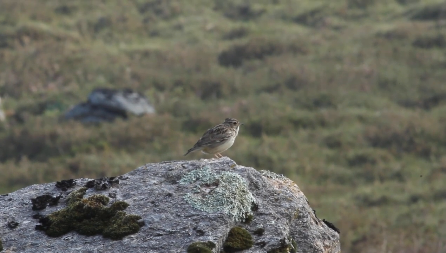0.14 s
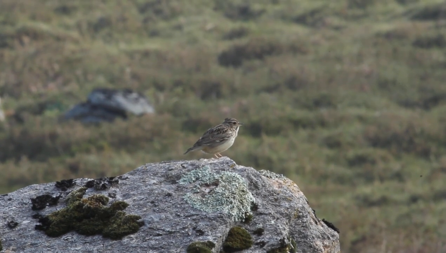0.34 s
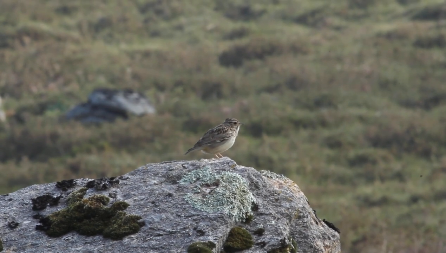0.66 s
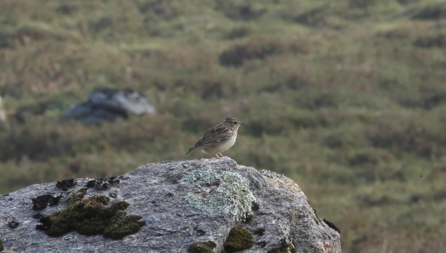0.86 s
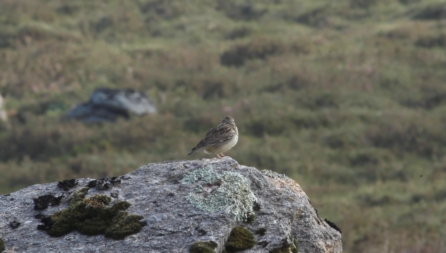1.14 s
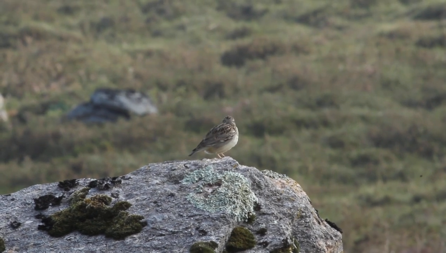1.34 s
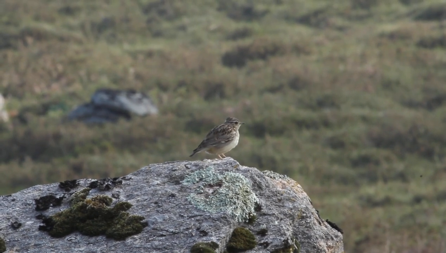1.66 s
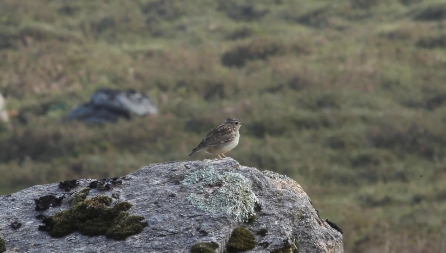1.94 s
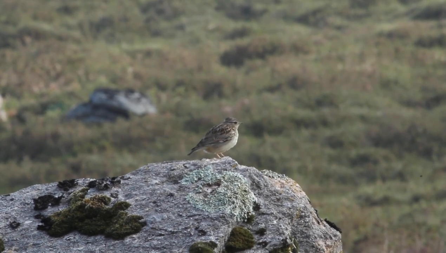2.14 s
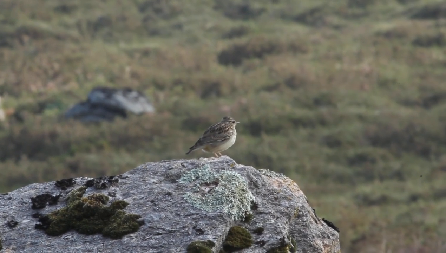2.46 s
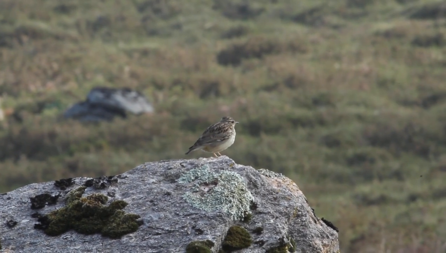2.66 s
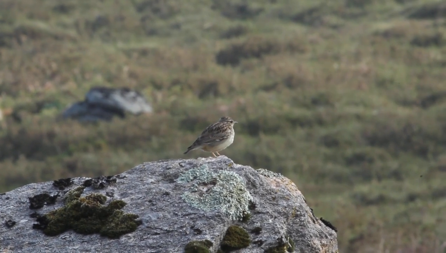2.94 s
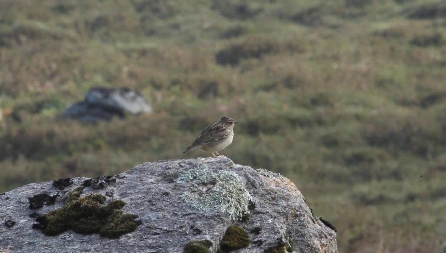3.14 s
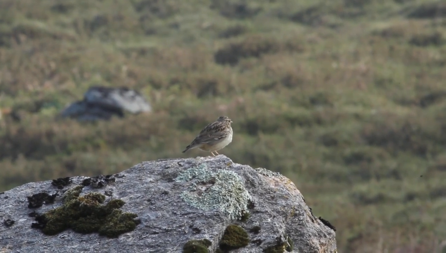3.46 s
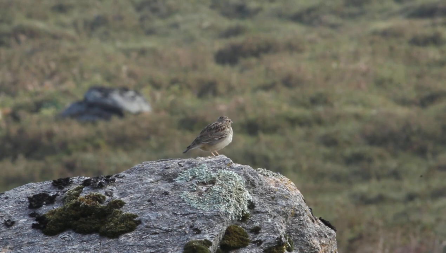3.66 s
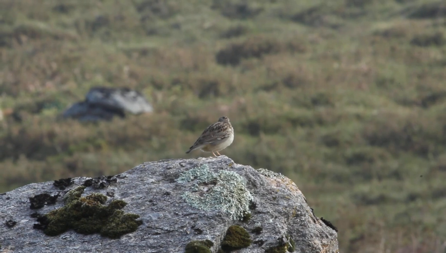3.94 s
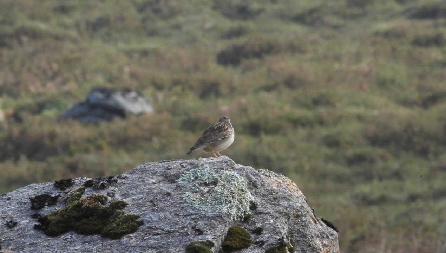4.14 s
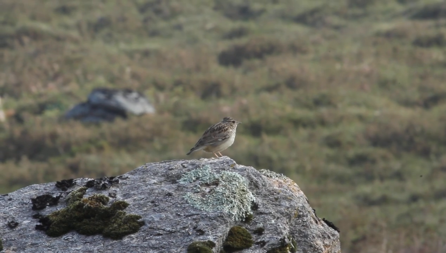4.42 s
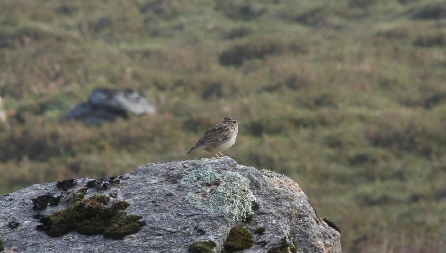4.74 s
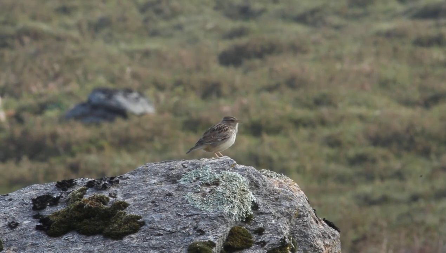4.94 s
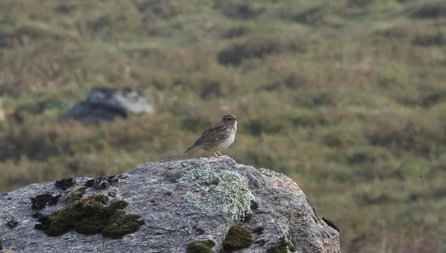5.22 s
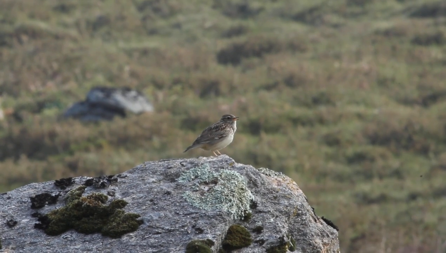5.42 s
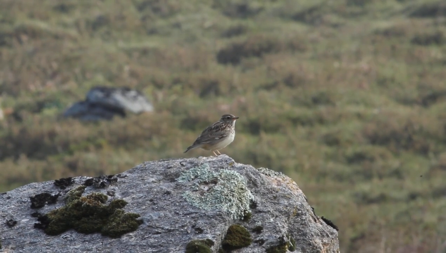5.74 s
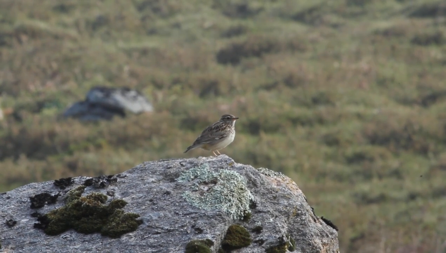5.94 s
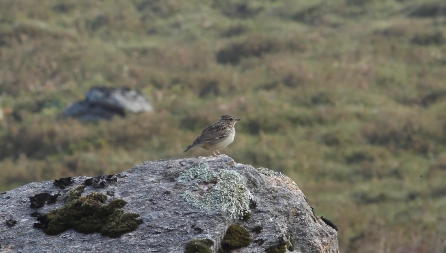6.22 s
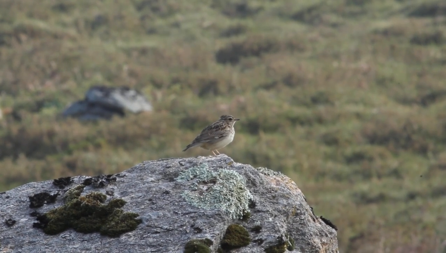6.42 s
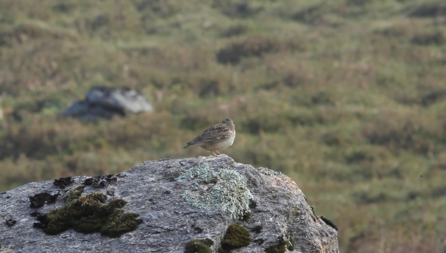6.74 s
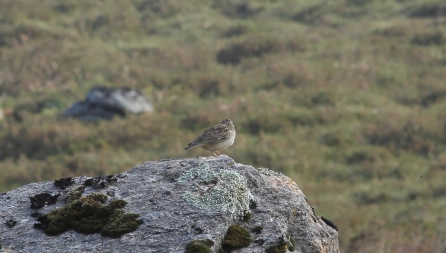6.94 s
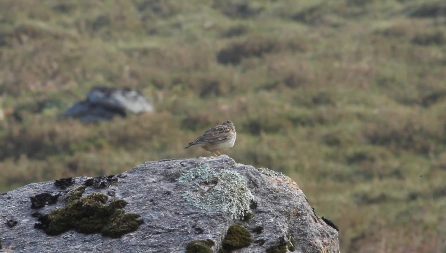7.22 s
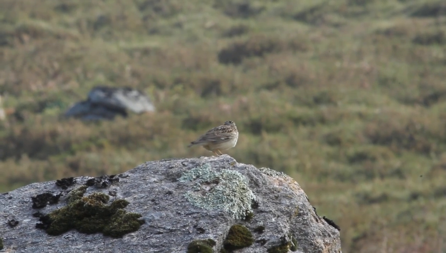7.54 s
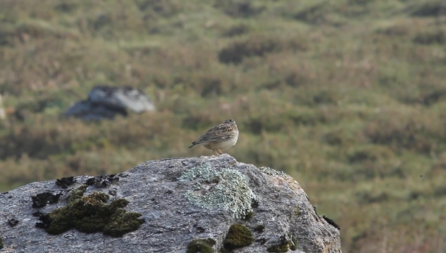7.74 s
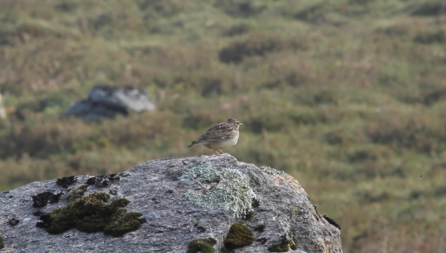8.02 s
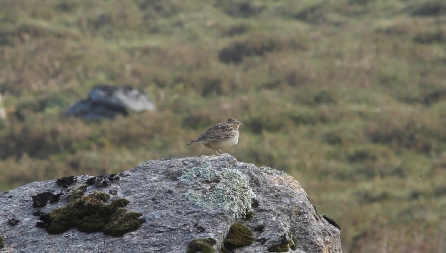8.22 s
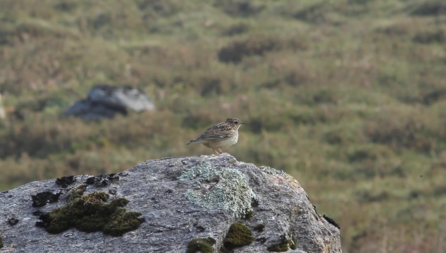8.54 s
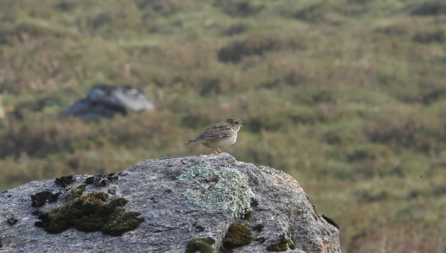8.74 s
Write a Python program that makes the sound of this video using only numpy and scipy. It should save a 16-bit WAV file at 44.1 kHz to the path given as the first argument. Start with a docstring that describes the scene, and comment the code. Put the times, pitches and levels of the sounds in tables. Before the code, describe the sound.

A small songbird whistles two clear, high phrases outdoors on a heath: a short one of three notes, then a longer, louder, descending one of seven wavering notes. Faint rising chirps follow each phrase, with distant birds in between. A soft, steady mechanical rattle and low hum continue throughout, along with a few ticks and even hiss. Wind briefly and faintly rumbles on the microphone in the second half.

```python
"""On a heathy hill, a woodlark on a boulder sings two phrases with its syrinx (a bird's voice box):
three arched whistles, then seven wavy ones that sink and swell. Short rising chips follow each phrase,
and other small birds call far off. Rocks and heath give a thin echo. Underneath, a motor hums low and
uneven taps rattle a small hollow body, while the air hisses and a few puffs of wind rumble."""
import sys
import numpy as np
from scipy import signal
from scipy.fft import rfft, irfft, next_fast_len
from scipy.io import wavfile
from scipy.ndimage import uniform_filter1d

SR = 44100
rng = np.random.default_rng(int(sys.argv[2]) if len(sys.argv) > 2 else 0)


def pcm_store(signal):
    """Save signal as 16-bit PCM."""
    levels = np.round(np.clip(np.atleast_2d(signal), -1, 1) * 32767)
    wavfile.write(sys.argv[1], SR, levels.astype(np.int16).T)


N = 391158
TIME = np.arange(N) / SR


def syrinx(notes, glide_s, flutter_db, second_db, third_db, waver=0.0032,
           throat_hz=3750, throat_width_hz=500, throat_db=4):
    """A nearly pure tone follows notes (t/s, f/Hz, level/dB); its third harmonic grows when pushed hard."""
    hz, gain = np.zeros(N), np.zeros(N)
    for note in notes:
        times, pitch, db = np.transpose(note)
        times = np.sort(times)
        span = slice(int(times[0] * SR), int(times[-1] * SR))
        hz[span.start:] = pitch[-1]
        hz[span] = smooth(np.interp(TIME[span], times, pitch), glide_s)
        gain[span] = undb(np.interp(TIME[span], times, db))
    gain = smooth(gain, seconds=0.00076) * undb(flutter_db * wander(200))
    phase = 2 * np.pi * np.cumsum(hz * (1 + waver * wander(405))) / SR
    # a note that starts an octave low rings the throat with its second harmonic: a tiny flick
    flick = undb(throat_db) * np.exp(-((2 * hz - throat_hz) / throat_width_hz) ** 2)
    # the second harmonic is also stronger where the song dips low
    second = flick + undb(second_db) * (throat_hz / np.maximum(hz, throat_hz / 2)) ** 3
    third = undb(third_db) * gain / undb(-24)  # -24 dB is full voice
    return np.sqrt(2) * gain * (np.sin(phase) + second * np.sin(2 * phase) + third * np.sin(3 * phase))


def arched_whistles(leap_half_s=0.0034):
    """The lark climbs, breaks, leaps, sags, holds and drops, three times and never quite alike."""
    # the shape they share: t from the leap/s, f/Hz, level/dB
    arch = [(-.062, 2570, -45.5), (-.041, 3060, -33), (-.026, 3250, -31.5), (-.012, 3475, -25),
            (-.006, 3220, -39), (0, 4440, -28.5), (.004, 4060, -26.5), (.014, 3780, -27.5),
            (.028, 3530, -34.5), (.05, 3428, -33.5), (.075, 3410, -32.5), (.094, 3530, -31),
            (.105, 3603, -30.5), (.112, 2970, -36.5)]
    # each whistle: leap t/s, climb shift/Hz, leap shift/Hz, hold shift/Hz, leap gain/dB, end gain/dB
    arches = [(.100, 3.5, -130, 24, -2, -0.5), (0.375, 4.5, 130, -0.5, -4, -0.5),
              (.657, -30, 80, -115, -5.5, -0.5)]
    # a soft low note before each: t/s, length/s, start f/Hz, end f/Hz, level/dB
    lead_ins = [(.001, 0.034, 2330, 2280, -51.5), (.262, 0.041, 2215, 2300, -55),
                (.545, 0.039, 2166, 2110, -50.5)]
    t, hz, db = np.transpose(arch)
    notes = []
    for leap, climb_hz, leap_hz, hold_hz, leap_db, end_db in arches:
        shift_hz = np.interp(t, [-leap_half_s, 0, leap_half_s], [climb_hz, leap_hz, hold_hz])
        shift_db = np.interp(t, [0, t[-1]], [leap_db, end_db])
        notes.append(np.column_stack([leap + t, hz + shift_hz, db + shift_db]))
    song = syrinx(notes, glide_s=0.0012, flutter_db=1.0, second_db=-42, third_db=-43)
    return song + slides(lead_ins, knee=0.97, fade=0.16, swell_db=1.5, second_db=-26)


def wavy_whistles(settle_s=0.006, release_db=-17):
    """The lark climbs to a loud crest, sinks, then swells as it lifts; the phrase gets lower and louder."""
    # each whistle: t/s, climb/s, sink/s, lift/s, place of the swell in the lift (0-1),
    # start f/Hz, crest f/Hz, trough f/Hz, end f/Hz, lateness of the climb,
    # start level/dB, crest level/dB, dip level/dB, swell level/dB
    waves = [(3.785, 0.045, 0.073, 0.039, 0.36, 3480, 4160, 3480, 4250, .95, -57, -46.5, -60, -42.5),
             (4.061, .047, 0.0605, .046, 0.4, 3720, 4260, 3444, 3670, .6, -51, -42, -62, -39),
             (4.335, .052, 0.073, 0.067, 0.4, 3540, 3885, 2980, 3460, 1.3, -48.5, -38, -50, -34),
             (4.588, 0.07, 0.073, .06, .67, 3384, 3660, 2860, 3280, 1.4, -41, -33.5, -55, -32.5),
             (4.855, 0.064, .077, .066, 0.64, 3250, 3546, 2790, 3155, 1.8, -43, -32, -50, -36.5),
             (5.129, .063, 0.08, 0.063, 0.77, 3213, 3474, 2742, 3185, 2.4, -38.5, -24, -46.5, -27.5),
             (5.402, .075, 0.073, .068, 0.83, 3160, 3536, 2710, 3030, 2.8, -37, -25.5, -50.5, -29.5)]
    # a scoop up from almost an octave below: t from the start/s, share of the start pitch, gain/dB
    scoop_shape = [(-.013, .57, -19), (-.005, .61, -17.5), (0, 0.95, 1)]
    notes = []
    for k, (start, climb, sink, lift, place, start_hz, crest_hz, trough_hz, end_hz, lateness,
            start_db, crest_db, dip_db, swell_db) in enumerate(waves):
        crest, trough, end = start + np.cumsum([climb, sink, lift])
        swell = trough + place * lift
        t = np.linspace(start + settle_s, end, 200)
        hz = (start_hz + (crest_hz - start_hz) * ease(t, start, crest, lateness)
              + (trough_hz - crest_hz) * ease(t, crest, trough, lateness=0.69)
              + (end_hz - trough_hz) * ease(t, trough, end, lateness=1.15))
        loudness = [(start + 0.36 * climb, start_db),
                    (crest - 0.002, crest_db), (crest + 0.011, crest_db),
                    (crest + 0.84 * sink, dip_db),
                    (swell - 0.0057, swell_db), (swell, swell_db),
                    (end, swell_db + release_db)]
        note = np.column_stack([t, hz, np.interp(t, *np.transpose(loudness))])
        scoop = [(start + offset, start_hz * share, start_db + db) for offset, share, db in scoop_shape]
        notes.append(np.vstack([scoop, note]) if k else note)  # the first whistle has no scoop
    return syrinx(notes, glide_s=0.0016, flutter_db=1.1, second_db=-46, third_db=-39.5)


def chips(ground_delay_s=0.004, ground_db=-15):
    """Short rising calls also arrive by way of the ground, which ripples their sweep."""
    # each chip: t/s, length/s, start f/Hz, end f/Hz, level/dB
    calls = [(3.122, 0.028, 2060, 3220, -51), (3.212, 0.03, 2090, 3170, -52.5),
             (3.307, 0.034, 1960, 3430, -52.5), (3.392, 0.036, 1910, 3160, -55),
             (6.713, 0.029, 2438, 3200, -55), (6.797, 0.029, 2110, 3110, -53.5),
             (7.439, 0.026, 1990, 3080, -57), (7.526, 0.032, 2070, 3240, -52.5),
             (7.615, 0.034, 1950, 3370, -50), (7.707, .033, 1900, 3100, -51),
             (7.799, 0.032, 1800, 3100, -49.5), (8.684, 0.021, 1690, 2340, -56.5),
             (8.756, 0.019, 1750, 2220, -57.5), (8.831, .024, 1710, 2270, -57)]
    direct = slides(calls, knee=0.72, fade=0.25, swell_db=4, second_db=-28)
    return direct + undb(ground_db) * np.interp(TIME - ground_delay_s, TIME, direct)


def far_birds():
    """Small birds far off whistle faint, high slides."""
    # each call: t/s, length/s, start f/Hz, end f/Hz, level/dB
    calls = [(.002, 0.064, 3720, 3690, -64), (.135, .018, 5900, 6150, -70), (.192, 0.033, 4840, 4770, -64),
             (.56, 0.06, 5770, 5800, -74), (.87, 0.041, 6050, 6300, -70), (1.35, 0.12, 5520, 5150, -75),
             (1.842, .025, 4850, 4500, -71), (1.865, .025, 4520, 5000, -70), (6.235, .07, 4840, 4280, -66),
             (6.28, 0.072, 6650, 5000, -68), (6.33, .045, 4500, 4330, -71), (6.375, 0.036, 5900, 7050, -69),
             (6.48, .016, 4420, 4400, -68), (6.503, .02, 3800, 3480, -66),
             (6.762, 0.034, 3980, 3600, -63.5), (7.94, 0.051, 4200, 4050, -73)]
    return slides(calls, knee=0.72, fade=0.35, swell_db=1.5, second_db=-42)


def hillside(sound, echo_db):
    """Adds a few rock echoes, quick scatter from the heath and a later wash from the slope."""
    # echoes from nearby rocks: delay/s, relative level/dB
    rocks = [(.0105, -15.5), (.019, -29), (.031, -23)]
    heath, slope = (-25, 0.27, 0), (-26, 0.49, 0.049)  # relative level/dB, time to fade 60 dB/s, delay/s
    echoes = np.zeros(SR)
    for db, fade_s, delay in (heath, slope):
        t = np.maximum(TIME[:SR] - delay, 0)
        build_up = 1 - np.exp(-t / 0.013)
        tail = rng.standard_normal(SR) * die_away(t, fade_s) * build_up
        echoes += undb(db) * tail / np.linalg.norm(tail)
    for delay, db in rocks:
        add(echoes, delay, undb([db]))
    return sound + undb(echo_db) * signal.fftconvolve(sound, echoes)[:N]


def rattle(taps_per_s=420, scatter_db=1.5, throb_db=1.4, contact_s=0.00057):
    """Dense uneven taps, and now and then a firmer tick, ring the small hollow body of a machine."""
    # the body's ringing tones: f/Hz, time to fade 60 dB/s, relative energy/dB
    body = [(295, 0.039, -7), (387, 0.12, -12.5), (496.5, 0.07, 0), (568, 0.091, -3), (611.7, 0.052, -3.5),
            (698, 0.059, -5), (802.5, 0.06, -16), (1496, 0.042, -12), (1568, 0.033, -12)]
    # the firmer ticks: t/s, level/dB
    ticks = [(.883, -45), (1.621, -39), (2.355, -43), (2.82, -38.5), (3.721, -38), (5.878, -38.5),
             (6.599, -39), (6.868, -36.5), (6.921, -38), (7.0, -42), (7.258, -49)]
    t = TIME[:SR // 6]
    ring = sum((-1) ** k * undb(db) / np.sqrt(fade_s) * die_away(t, fade_s) * np.sin(2 * np.pi * hz * t)
               for k, (hz, fade_s, db) in enumerate(body))
    ring /= np.abs(ring).max()
    taps = (rng.random(N) < taps_per_s / SR) * rng.choice([-1, 1], N)
    taps = taps * undb(scatter_db * rng.standard_normal(N).clip(-2, 2))
    taps *= undb(throb_db * wander(25))
    rise_db = np.interp(TIME, [0, 0.44], [-54, -51])
    out = set_level(signal.fftconvolve(taps, ring)[:N], rise_db)
    for start, db in ticks:
        click = 0.33 * smooth(rng.standard_normal(len(t)), seconds=0.0001) * np.exp(-t / contact_s)
        add(out, start, undb(db) * (ring + click))
    return cut_bass(out, hz=83)  # so small a body gives off no bass


def motor_hum(hz=134.6, drift=0.0196, waver_db=-2.5):
    """A low motor tone wanders in pitch and strength."""
    phase = 2 * np.pi * np.cumsum(hz * (1 + drift * wander(17.3))) / SR
    return set_level(np.sin(phase) * undb(waver_db * wander(18)), db=-66.5)


def air():
    """The open hill hisses evenly; puffs of wind rumble briefly on the microphone."""
    # the hiss of open air and microphone: f/Hz, relative level/dB
    hiss = [(20, -31), (40, -14), (85, -12.5), (160, 0), (260, -2.5), (450, 2), (750, 0.5), (1000, -5.5),
            (1350, -6.5), (1900, -11), (4500, -16), (7000, -19.5), (10500, -23.5), (15500, -30.5)]
    # puffs of wind: middle t/s, length/s, peak level/dB
    puffs = [(5.95, 0.27, -60), (6.22, 0.25, -69), (8.44, 0.037, -57), (8.53, .03, -62),
             (8.727, 0.039, -59)]
    gusts = sum(undb(db) * np.exp(-(2 * (TIME - middle) / length) ** 2) for middle, length, db in puffs)
    rumble = noise([(15, -14), (45, 1), (120, -12), (400, -34), (2000, -80)])
    return set_level(noise(hiss), db=-53.5) + gusts * set_level(rumble, db=0)


def slides(calls, knee, fade, swell_db, second_db):
    """Short tones glide straight, then level off at the knee; knee and fade are shares of their length."""
    out = np.zeros(N)
    for start, length, from_hz, to_hz, db in calls:
        progress = np.linspace(0, 1, int(length * SR))
        glide = progress / (1 + (progress / knee) ** 8) ** (1 / 8)
        phase = 2 * np.pi * np.cumsum(from_hz + (to_hz - from_hz) * glide / glide[-1]) / SR
        tone = np.sin(phase) + undb(second_db) * np.sin(2 * phase)
        soft_ends = ease(np.minimum(progress, 1 - progress), 0, fade)
        add(out, start, set_level(tone * soft_ends * undb(swell_db * progress), db))
    return out


def undb(db):
    """Turns decibels into a gain."""
    return 10 ** (np.asarray(db) / 20)


def set_level(sound, db):
    """Scales a sound to an average (rms) level."""
    return sound * undb(db) / np.sqrt(np.mean(sound ** 2))


def ease(t, start, end, lateness=1):
    """An S-shaped move from 0 to 1; a lateness over 1 holds it back."""
    return np.sin(np.pi / 2 * np.clip((t - start) / (end - start), 0, 1) ** lateness) ** 2


def die_away(t, fade_s):
    """A gain that falls 60 dB in fade_s."""
    return np.exp(-np.log(1000) * t / fade_s)


def smooth(curve, seconds):
    """Rounds the corners of a curve."""
    size = max(int(seconds * SR), 1)
    return uniform_filter1d(uniform_filter1d(curve, size), size)


def wander(rate):
    """A smooth random curve, about 1 in size, that changes about rate times a second."""
    size = next_fast_len(N, True)
    hz = np.arange(size // 2 + 1) * SR / size
    spectrum = rfft(rng.standard_normal(size)) / (1 + (2 * hz / rate) ** 4)
    return set_level(irfft(spectrum, size)[:N], db=0)


def noise(points):
    """Noise shaped by points of f/Hz, level/dB."""
    hz, db = np.transpose(points)
    size = next_fast_len(N, True)
    all_hz = np.maximum(np.arange(size // 2 + 1) * SR / size, 1)
    gain = undb(np.interp(np.log(all_hz), np.log(hz), db))
    return irfft(rfft(rng.standard_normal(size)) * gain, size)[:N]


def cut_bass(sound, hz):
    """Turns down everything below a frequency."""
    return signal.sosfilt(signal.butter(2, hz, "high", fs=SR, output="sos"), sound)


def add(track, start_s, sound):
    """Mixes a sound into a track."""
    i = int(np.clip(start_s * SR, 0, N - 1))
    track[i:i + len(sound)] += sound[:N - i]


def scene():
    """The lark and its neighbours echo on the hill, over the machine and the air."""
    birds = hillside(arched_whistles() + wavy_whistles(), echo_db=-0.5)
    birds += hillside(chips(), echo_db=1)
    birds += hillside(far_birds(), echo_db=9)
    return (birds + rattle() + motor_hum() + air())[None]


def record(dry, low_cut_hz=28, top_hz=15700):
    """Drops the deepest rumble and the highest treble."""
    treble_cut = signal.ellip(12, 0.1, 70, top_hz, fs=SR, output="sos")
    return signal.sosfilt(treble_cut, cut_bass(dry, low_cut_hz))


dry = scene()
out = record(dry)
pcm_store(out)
```